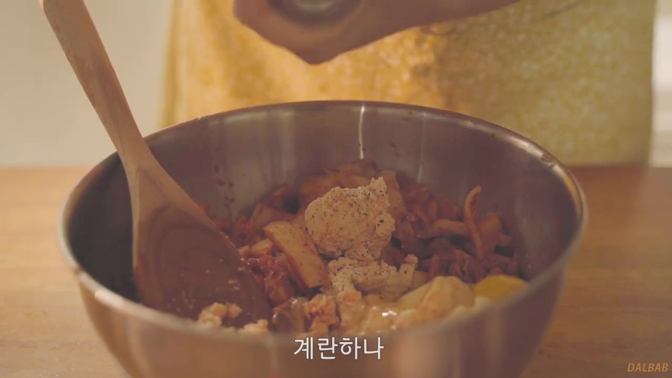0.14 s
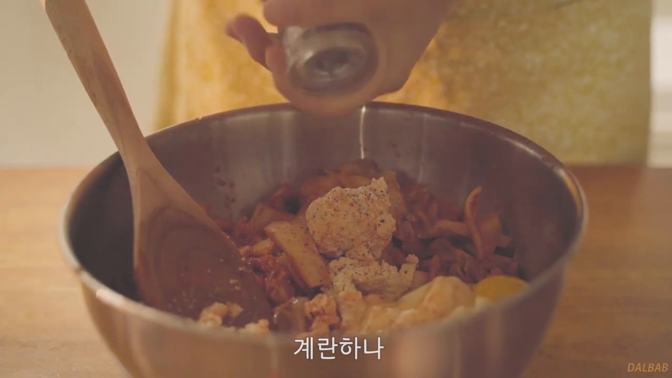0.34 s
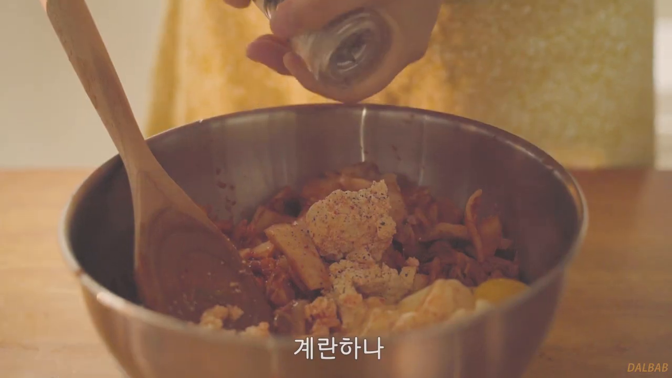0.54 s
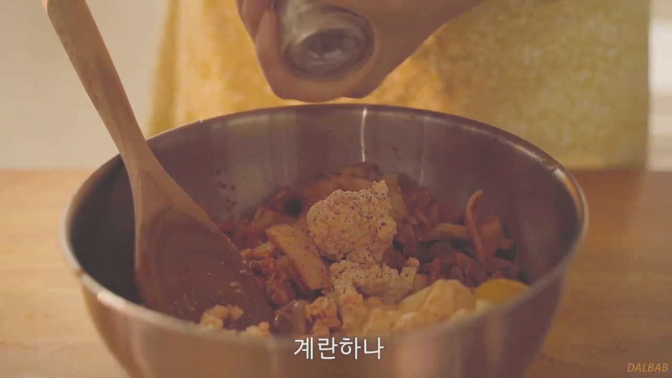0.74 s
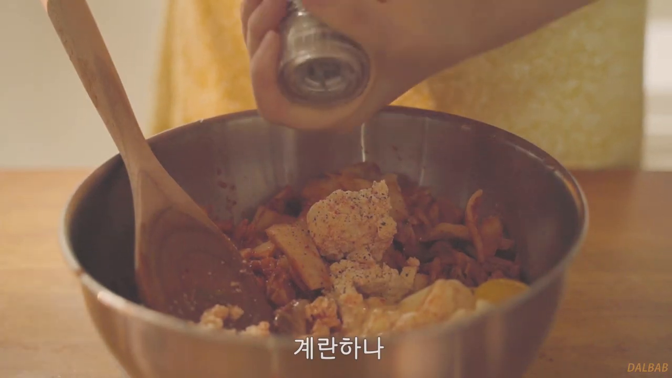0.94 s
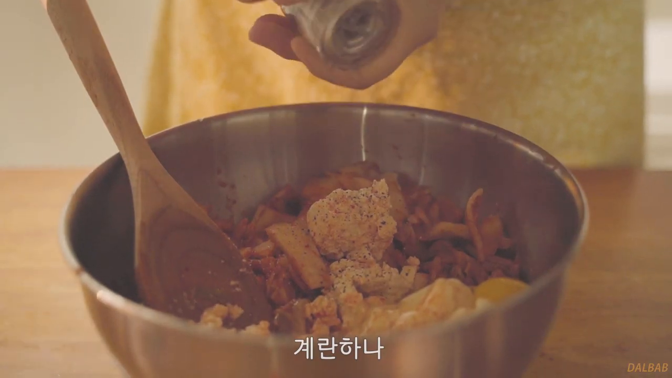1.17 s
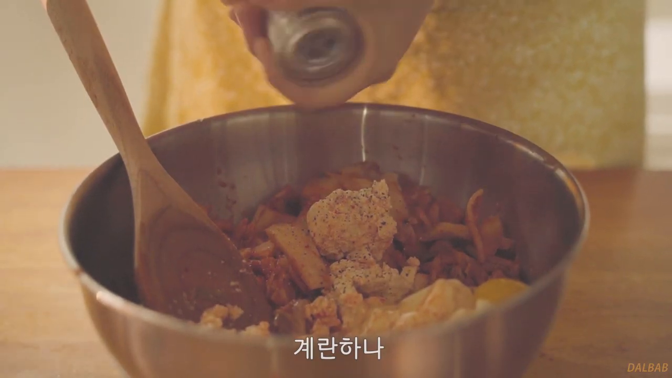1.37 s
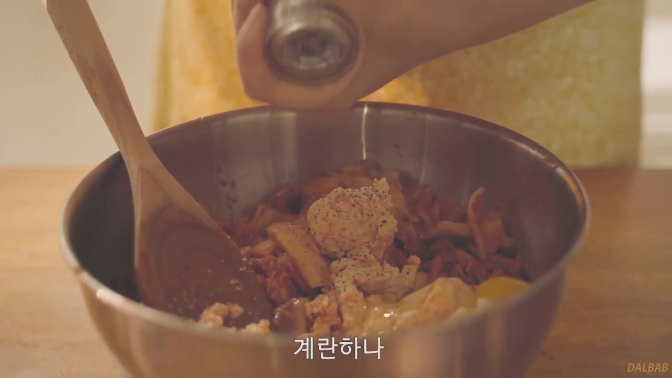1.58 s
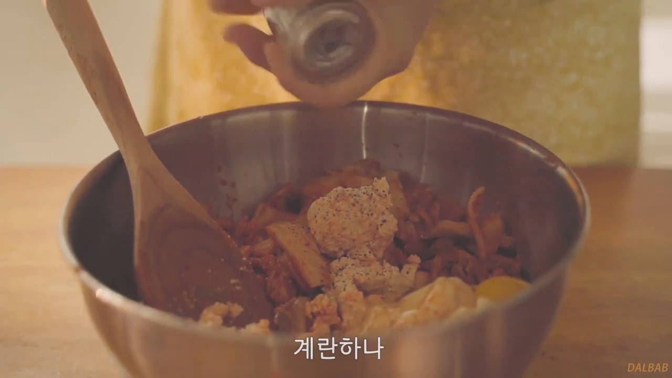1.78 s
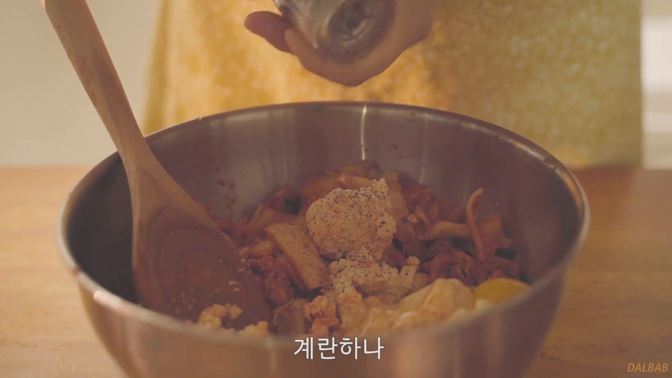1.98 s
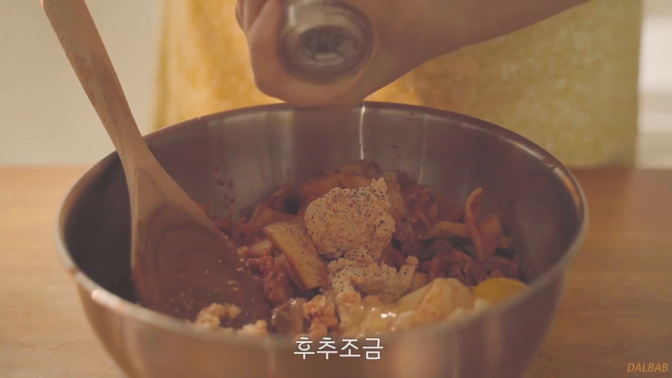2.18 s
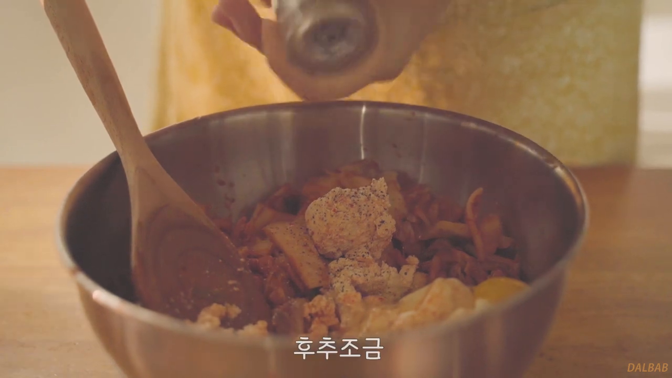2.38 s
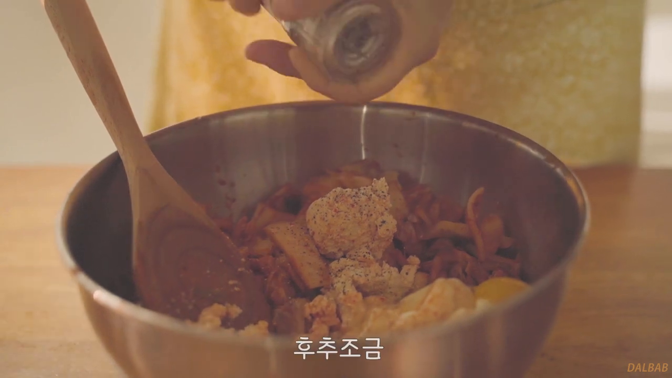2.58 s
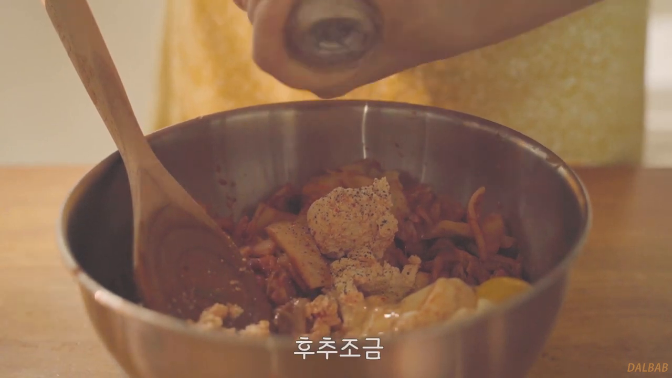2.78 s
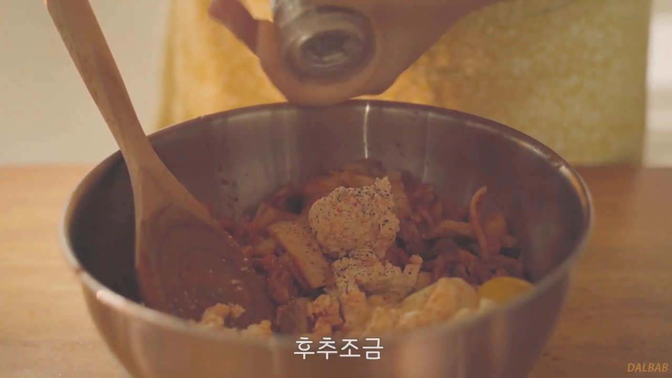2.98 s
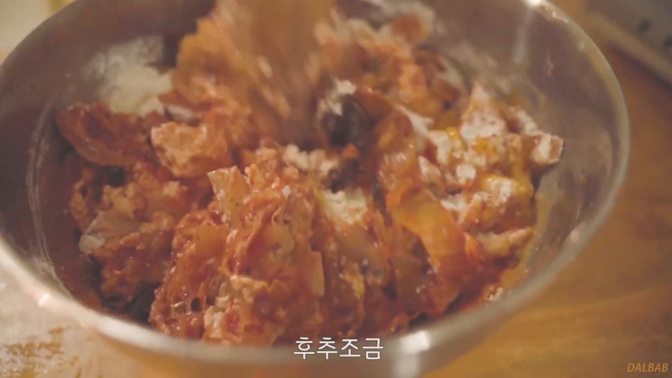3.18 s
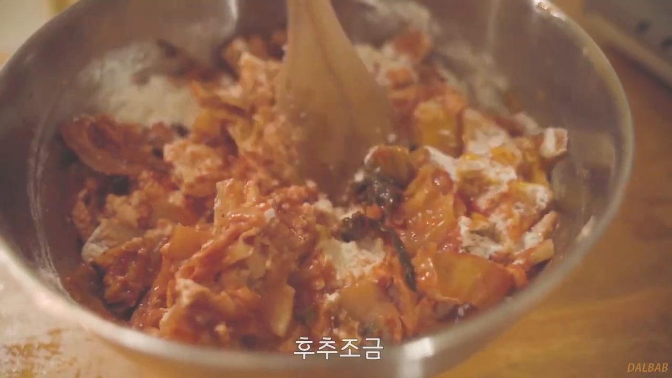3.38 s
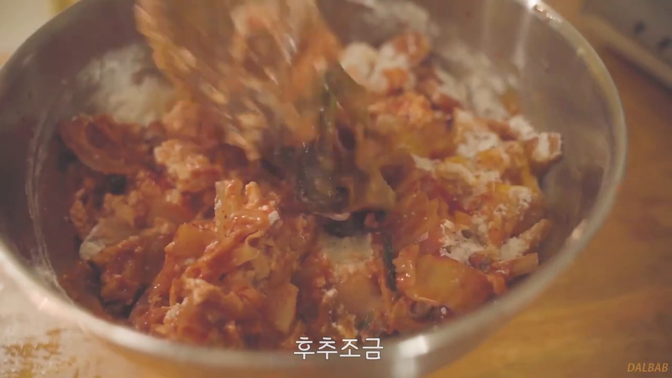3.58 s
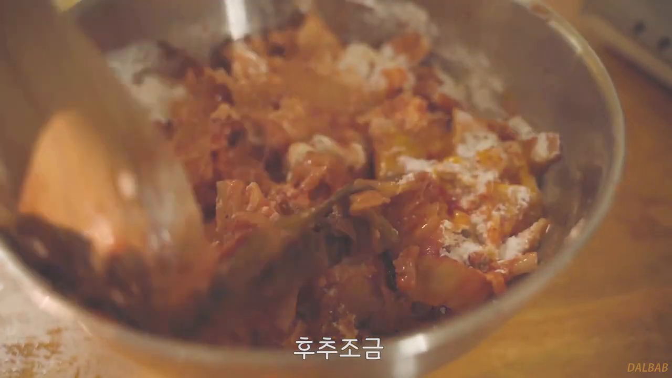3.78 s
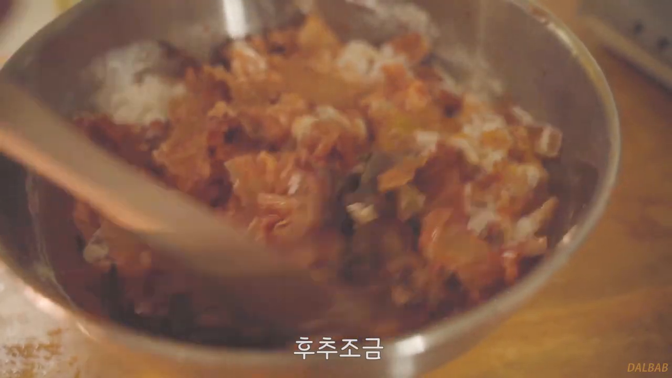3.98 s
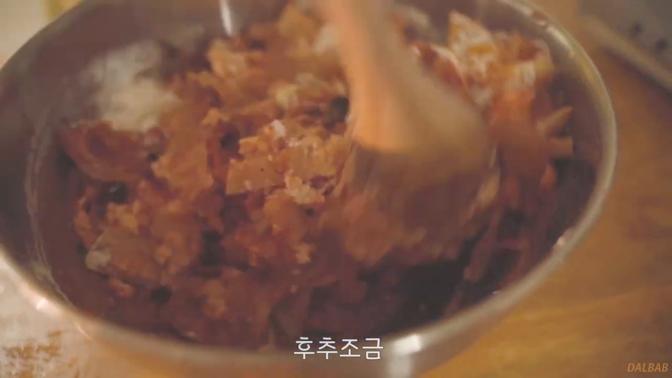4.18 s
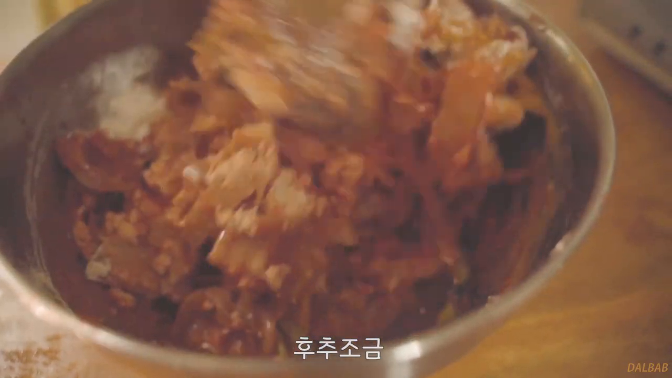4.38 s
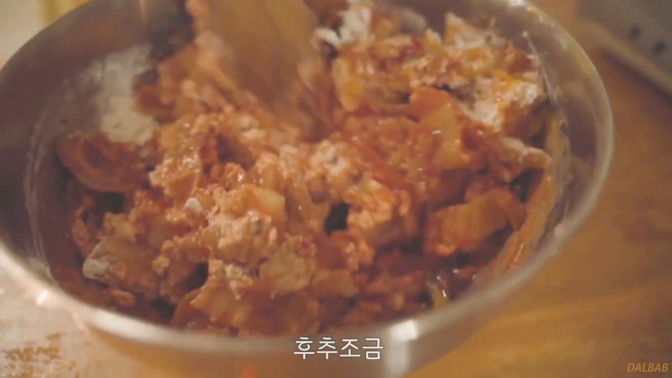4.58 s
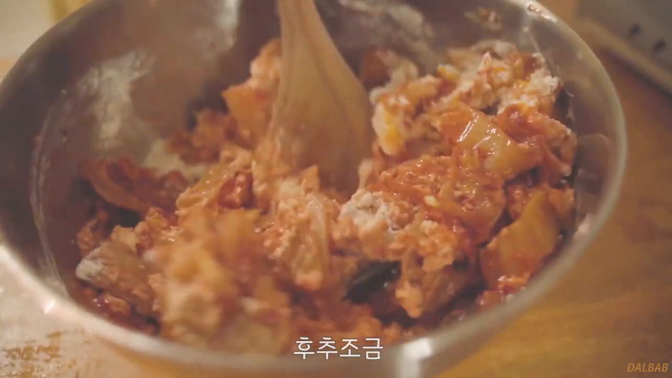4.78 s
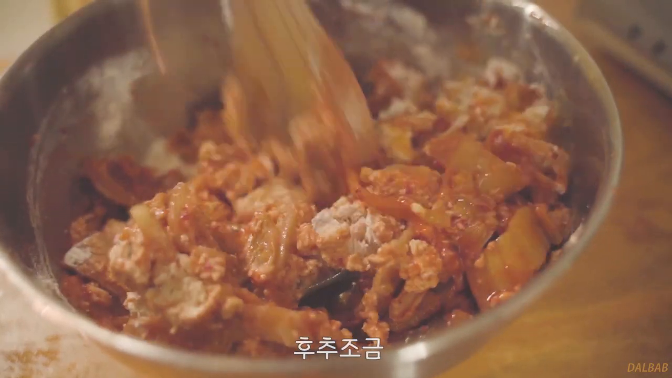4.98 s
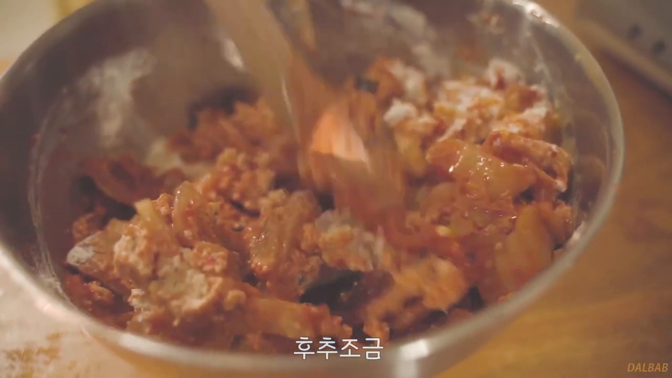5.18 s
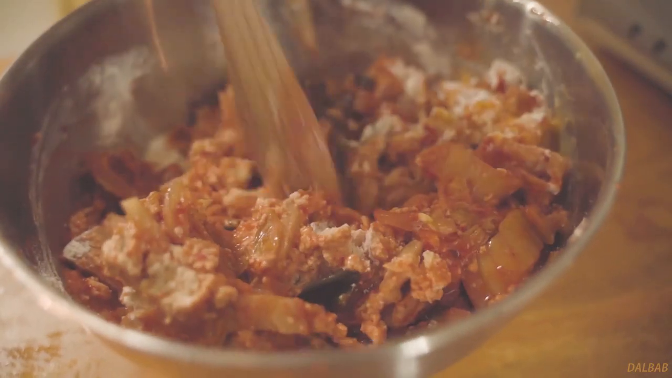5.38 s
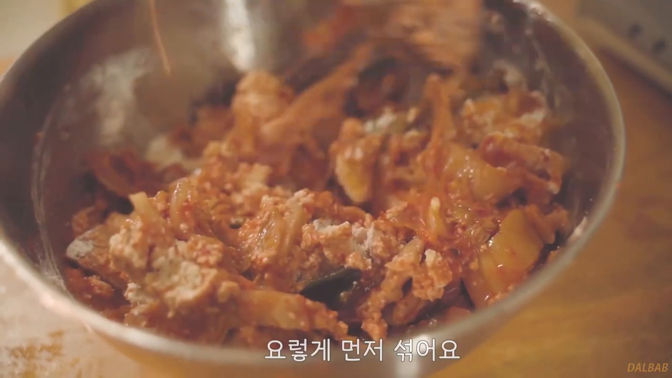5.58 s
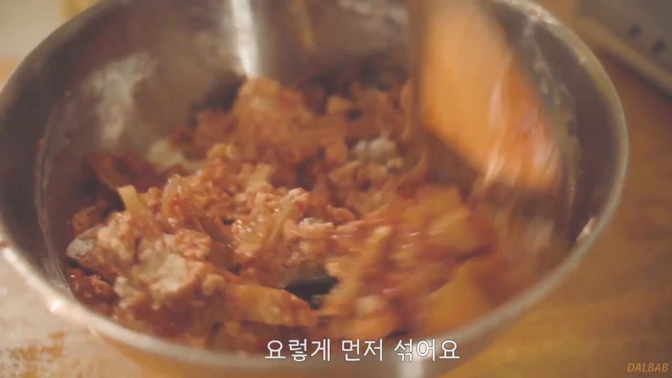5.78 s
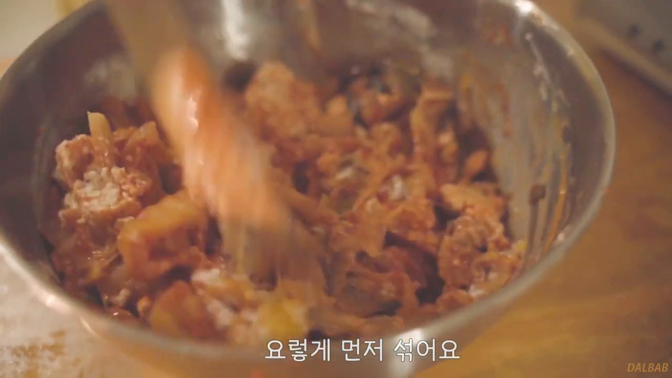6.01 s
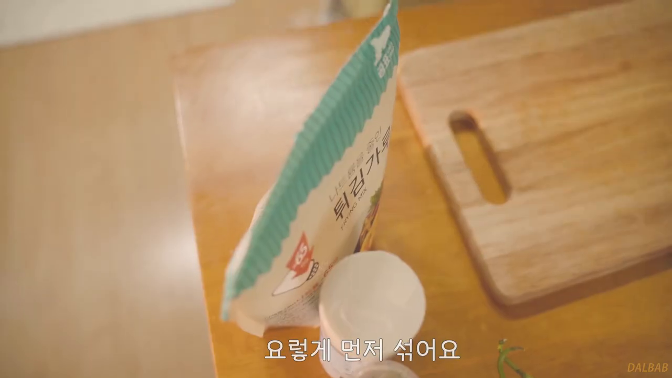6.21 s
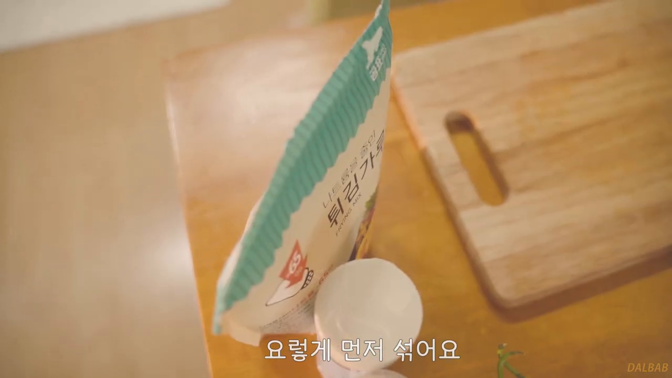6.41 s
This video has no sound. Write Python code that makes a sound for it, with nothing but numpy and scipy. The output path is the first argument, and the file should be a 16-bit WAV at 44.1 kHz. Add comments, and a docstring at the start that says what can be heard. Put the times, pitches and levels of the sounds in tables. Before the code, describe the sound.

Crisp dry peppercorn crunches in rhythmic bursts give way to moist mashing, scrapes and dull bowl knocks, ending with a soft packet slide.

```python
"""Dry cracks and fine grinding in short twists, then wet squelches, scrapes and knocks, and a soft slide at the end.
A hand pepper mill breaks peppercorns over a steel bowl: snapped noise bursts over gated grit. A wooden spoon
mashes wet food in the bowl: bursts for pops, coloured crackle for squelch and drag, ringing blows for knocks.
A packet slides on the wooden table: coloured grains. A quiet kitchen adds hush and reverberation; one microphone.
"""
import sys
import numpy as np
from scipy import signal
from scipy.fft import rfft, irfft, next_fast_len
from scipy.io import wavfile
from scipy.ndimage import uniform_filter1d, minimum_filter1d

SR = 44100
rng = np.random.default_rng(int(sys.argv[2]) if len(sys.argv) > 2 else 0)


def output_pcm(signal):
    """Save a mono or channel-first signal as 16-bit PCM at the path in sys.argv[1].

    Samples are clipped to [-1, 1] before scaling.
    """
    pcm = np.clip(np.atleast_2d(signal).T, -1, 1) * 32767
    wavfile.write(sys.argv[1], SR, np.round(pcm).astype(np.int16))


def volts_from_decibels(level):
    """Turn decibel levels (scalar or array-like) into linear amplitude factors."""
    exponent = np.asarray(level, float) / 20
    return 10 ** exponent


N = 284445

# Kitchen hush. Each row: frequency in Hz, relative density in dB per Hz.
HUSH_SPECTRUM = [(18, -29.5), (30, -18.5), (86, -0.5), (134, -11), (221, -7), (554, -13.5), (5310, -32.5),
                 (10200, -26.5), (16000, -40.5)]
HUSH_RMS_DB = -62.5
# Kitchen reverberation. Each row: frequency in Hz, t60 in seconds.
KITCHEN_T60 = [(200, 0.43), (2000, 0.24), (4500, 0.25), (12000, 0.26)]
# Packet sliding to rest on the table. Each row: time in seconds, gain in dB.
SLIDE_GAIN = [(6.3, -82.5), (6.317, -46.5), (6.36, -48), (6.4, -58), (6.449, -65)]
# Colour of the packet. Each row: frequency in Hz, relative density in dB per Hz.
PACKET_SPECTRUM = [(240, -30), (400, -13.5), (570, -4), (1440, -4), (2250, -21.5), (4240, -8.5),
                   (9320, -16.5), (13700, -13), (16000, -25.5)]
# Faint rubs in one resonance. Each row: start in seconds, end in seconds, centre in Hz, width in Hz, top level in dB.
RUB_BANDS = [(0.156, 0.655, 2150, 800, -50.5), (2.82, 3.124, 1490, 90, -59),
             (3.598, 3.917, 1350, 702, -64.5), (3.92, 4.196, 7500, 1300, -49.5)]

# Spoon striking the bowl. Each row: peak time in seconds, push peak in dB, pitch in Hz, t60 of the push in seconds.
SPOON_KNOCKS = [(3.3567, -27, 320, 0.086), (3.3839, -20.5, 744, 0.041), (3.4052, -34, 970, 0.029),
                (3.4329, -28, 903, 0.034), (3.578, -35, 710, 0.033), (3.6023, -32.5, 806, 0.056),
                (4.0638, -36, 850, 0.016), (4.1403, -30, 270, 0.017), (4.4603, -16, 344, 0.019),
                (4.4705, -12.5, 312, 0.019), (4.6363, -39.5, 1020, 0.02), (4.7472, -7, 420, 0.012),
                (4.7947, -26.5, 910, 0.022), (4.8016, -32, 805, 0.019), (4.831, -22, 352, 0.0073),
                (4.8421, -4, 302, 0.017), (4.9383, -29.5, 920, 0.019), (5.0071, -38, 740, 0.029),
                (5.3126, -32.5, 930, 0.035), (5.3619, -32.5, 920, 0.018), (5.3709, -28.5, 884, 0.018),
                (5.379, -28.5, 169, 0.02), (5.7297, -9.5, 307.5, 0.064)]
# Modes of the loaded bowl. Each row: frequency in Hz, dB over the push for a blow at that pitch, t60 in seconds.
BOWL_MODES = [(253, -22.5, 0.13), (314.7, -28.5, 0.19), (460, -24, 0.089), (592, -19.5, 0.11),
              (709, -13, 0.1), (847, -2.5, 0.049), (1148, 2, 0.025)]
# Jolts of the table top. Each row: peak time in seconds, push peak in dB.
TABLE_JOLTS = [(0.8934, -45), (3.3896, -39.5), (3.937, -52), (4.139, -51), (4.464, -51), (4.75, -39),
               (4.8416, -32), (5.374, -38), (5.7295, -42.5), (6.255, -50.5), (6.3236, -43)]
# Overtone of the table top. Each row: frequency in Hz, dB over the push, t60 in seconds.
TABLE_MODES = [(121, 5, 0.1)]

# Air pockets bursting in the mash. Each row: time in seconds, peak in dB, pitch in Hz, spread in octaves.
MASH_POPS = [(3.1815, -23, 8630, 0.25), (3.2194, -27, 1620, 0.12), (3.269, -27, 9240, 0.26),
             (3.3834, -16, 2600, 0.27), (3.5802, -17.5, 4180, 0.77), (3.659, -22.5, 12300, 0.38),
             (4.015, -23, 7770, 0.21), (4.053, -19.5, 6500, 0.91), (4.065, -24, 4800, 0.8),
             (4.1321, -19, 11000, 0.68), (4.277, -29.5, 3570, 0.24), (4.3285, -19.5, 2570, 0.36),
             (4.371, -26.5, 3030, 0.42), (4.5085, -17.5, 2310, 0.49), (4.5343, -14, 2120, 0.55),
             (4.6258, -18.5, 2330, 0.32), (4.747, -7.5, 2060, 0.91), (4.841, -13.5, 1480, 0.18),
             (5.0686, -18, 12000, 0.61), (5.0786, -21.5, 8770, 0.78), (5.118, -20.5, 9200, 0.39),
             (5.2494, -23, 6750, 1.1), (5.3102, -21.5, 3020, 0.58), (5.364, -22.5, 4300, 0.19),
             (5.4319, -16.5, 4360, 0.27), (5.4571, -18, 10100, 0.28), (5.464, -14.5, 11100, 0.82),
             (5.4793, -18.5, 13700, 0.17), (5.5035, -20, 8800, 0.46), (5.566, -42, 1090, 0.17),
             (5.7239, -8, 4900, 0.55), (5.8935, -23, 3660, 0.57), (5.9477, -23, 4800, 0.5),
             (5.986, -27, 2980, 0.21), (6.0266, -23.5, 4250, 0.26), (6.066, -20.5, 4100, 0.46),
             (6.0953, -21, 5100, 0.7), (6.1066, -16.5, 4460, 0.4), (6.1487, -18.5, 12000, 0.43),
             (6.192, -28.5, 6220, 0.55)]
# Strokes of the spoon. Each row: start in seconds, end in seconds, wet crackle gain in dB, bowl drag gain in dB.
SPOON_STROKES = [(3.184, 3.322, -53.5, -59), (3.357, 3.409, -39, -40.5), (3.576, 3.603, -41.5, -48),
                 (3.91, 3.921, -42, -49), (3.991, 4.04, -46.5, -62), (4.058, 4.153, -46.5, -47),
                 (4.183, 4.415, -48, -62.5), (4.449, 4.556, -40, -48), (4.6, 4.71, -53.5, -57.5),
                 (4.72, 4.95, -47, -44.5), (5.029, 5.127, -50.5, -61), (5.213, 5.244, -58, -58.5),
                 (5.305, 5.32, -43.5, -60), (5.359, 5.36, -46.5, -43), (5.414, 5.493, -51.5, -50.5),
                 (5.751, 5.925, -46.5, -51.5), (5.94, 6.144, -52, -61)]
# Colour of the wet crackle. Each row: frequency in Hz, relative density in dB per Hz.
WET_SPECTRUM = [(590, -41), (1000, -3.5), (2180, -2), (2810, 0), (5310, -5.5), (7620, -2.5), (9490, -7),
                (16000, -7.5)]
# Colour of the drag. Each row: frequency in Hz, relative density in dB per Hz.
DRAG_SPECTRUM = [(88, -17), (150, -7.5), (319, -3.5), (449, -14), (864, -6), (1400, -13), (2730, -25),
                 (4500, -31), (5850, -44.5), (9900, -120)]
# A stroke leads in, drops quickly, then the food settles from a level under the stroke.
LEAD_IN_S, LIFT_DB_PER_S, SETTLE_DB, SETTLE_DB_PER_S = 0.066, 502, -12, 84
# A knock shakes the food: drag gain under the knock, and its fade.
SKID_DB, SKID_DB_PER_S = -25, 366

# Peppercorns breaking between the burrs. Each row: time in seconds, peak in dB before the bass cut, band centre in Hz.
PEPPER_CRACKS = [(0.1607, -5, 7150), (0.169, -14, 7960), (0.1795, 4.5, 4140), (0.391, -15, 2400),
                 (0.4142, -3, 7400), (0.4394, -5.5, 5960), (0.4785, -14.5, 7200), (0.489, -3, 7600),
                 (0.5226, -7, 9300), (0.536, -8.5, 6500), (0.7302, -8.5, 8800), (0.821, -1.5, 6700),
                 (0.8471, -22.5, 4070), (0.8539, -6, 4400), (0.9237, -5, 7560), (0.9508, 5, 2280),
                 (1.127, -4, 7000), (1.1349, -5, 7200), (1.1427, -7, 4300), (1.1644, -7.5, 5400),
                 (1.175, -13.5, 8750), (1.197, -3.5, 8830), (1.228, -4.5, 9450), (1.2352, -16.5, 7000),
                 (1.267, -1.5, 8200), (1.4773, -3, 6300), (1.5019, -6, 5500), (1.5214, -10, 9100),
                 (1.5346, -5.5, 9660), (1.5411, -13.5, 6330), (1.5929, -4.5, 7750), (1.801, -4, 9120),
                 (1.8074, 4.5, 7160), (1.8615, -3, 8300), (1.964, -17, 5000), (2.1117, -6.5, 6360),
                 (2.1261, 1, 3760), (2.1436, -8, 9630), (2.1666, 10.5, 3840), (2.1834, -1.5, 7930),
                 (2.2271, -2, 5400), (2.4225, -14, 8700), (2.4429, -5, 5640), (2.4896, -7.5, 11000),
                 (2.534, -6.5, 9300), (2.5411, -5, 11030), (2.5883, -11, 9450), (2.7982, -2.5, 7200),
                 (2.8163, -12, 7100), (2.8412, -19, 5240), (2.8466, -9, 8530), (2.8553, -2, 6930),
                 (3.0596, -15, 6500), (3.0614, 4.5, 7060), (3.0718, -5, 10000), (3.082, -5, 9200),
                 (3.096, -6, 7700), (3.12, -10, 6160)]
# Colour of the grinding. Each row: frequency in Hz, relative density in dB per Hz.
GRIND_SPECTRUM = [(180, -55), (300, -15), (870, -18), (2360, 0), (3030, -9), (3460, -2), (6520, 0),
                  (12300, -6), (16000, -6.5)]
# Upper bowl modes that answer the mill. Each row: centre in Hz, width in Hz, added response in dB.
BOWL_SHEEN = [(1940, 1800, 0.5), (4040, 720, 5.5), (6500, 190, -2.5)]
# Twists of the wrist, faint ones as the hand regrips. Each row: full speed from and to in seconds,
# grinding gain at the start and at the end in dB, run-up in seconds.
WRIST_TWISTS = [(0.157, 0.186, -15.5, -34.5, 0.002), (0.398, 0.534, -31.5, -36.5, 0.11),
                (0.585, 0.626, -50, -57.5, 0.011), (0.717, 0.85, -41.5, -23.5, 0.055),
                (1.127, 1.241, -36, -28.5, 0.029), (1.445, 1.539, -38, -23, 0.019),
                (1.791, 1.918, -40, -34.5, 0.043), (1.994, 2.057, -55, -64, .02),
                (2.126, 2.197, -26, -25, 0.055), (2.433, 2.537, -32.5, -42.5, 0.056),
                (2.613, 2.697, -55.5, -59.5, .02), (2.763, 2.844, -28, -21.5, 0.073),
                (2.999, 3.112, -36.5, -38, 0.032)]
# Climb of any run-up, twist or stroke.
RUN_UP_DB = 35
# The hand stops: a quick drop, then crumbs trickle from a level under the twist.
STOP_DB_PER_S, TRICKLE_DB, TRICKLE_DB_PER_S = 901.5, -12, 158.5
# Each crack sheds crumbs into the grinding: gain under the crack, and its fade.
CRUMBS_DB, CRUMBS_DB_PER_S = -39, 408


def unit(x):
    """Scaled to rms 1."""
    return x / np.sqrt(np.mean(x ** 2) + 1e-20)


def along(points, hz):
    """(Hz, value) points read on a log frequency axis."""
    point_hz, value = np.transpose(points)
    return np.interp(np.log(hz + 1), np.log(point_hz + 1), value)


def gain_curve(rows):
    """Gain per sample from (s, dB) rows, -120 dB outside them."""
    s, db = np.transpose(rows)
    return volts_from_decibels(np.interp(np.arange(N) / SR, s, db, -120, -120))


def filtered(x, response):
    """x times a response of frequency."""
    size = next_fast_len(N + SR // 2)
    return irfft(rfft(x, size) * response(np.fft.rfftfreq(size, 1 / SR)), size)[:N]


def coloured(x, spectrum, flat_hz):
    """x whitened over flat_hz, shaped by a spectrum and scaled to rms 1."""
    z = rfft(x)
    own = np.sqrt(uniform_filter1d(np.abs(z) ** 2, int(flat_hz * N / SR) + 1))
    colour = volts_from_decibels(along(spectrum, np.fft.rfftfreq(N, 1 / SR)))
    return unit(irfft(z / own * colour, N))


def bursts(s, db, hz, spread_oct, decay_s, skirt_db, snap, size=512):
    """Short decaying noise bursts, each centred on its own band and led by a sharp snap."""
    t = (np.arange(size) - size // 4) / SR
    body = np.exp(-np.abs(t) / np.where(t < 0, decay_s / 16, decay_s))
    shape = body + snap * np.exp(-np.abs(t) * 8 / decay_s)
    octaves = np.log2((np.fft.rfftfreq(size, 1 / SR) + 1) / np.c_[hz]) / np.c_[spread_oct]
    # no two fragments share a colour
    lumps = unit(uniform_filter1d(rng.standard_normal(octaves.shape), size // 32))
    colour = (np.exp(-octaves ** 2 / 4) + volts_from_decibels(skirt_db)) * volts_from_decibels(3 * lumps)
    noise = rng.standard_normal((len(s), size))
    rows = irfft(rfft(shape * noise) * colour, size)
    rows *= volts_from_decibels(np.c_[db]) / np.abs(rows).max(1, keepdims=True)
    at = np.round(np.c_[s] * SR).astype(int) + np.arange(size)
    return np.bincount(at.ravel(), rows.ravel(), N + size * 2)[size // 4:][:N]


def crackle(start_s, end_s, count, hz, scatter_oct, spread_oct, decay_s, size_db, hiss):
    """Random grains of uneven size, rms 1 over their span, on a steady hiss."""
    when, pitch, big = rng.random((count, 3)).T
    s = start_s + when * (end_s - start_s)
    db = -size_db * np.log(big + 1 / 20)
    centre_hz = np.minimum(hz * 2 ** (scatter_oct * (2 * pitch - 1)), SR / 2.5)
    grains = bursts(s, db, centre_hz, np.full(count, spread_oct), decay_s, -21.5, snap=0.27, size=256)
    grains = grains / np.sqrt(np.sum(grains ** 2) / ((end_s - start_s) * SR))
    return grains + hiss * rng.standard_normal(N)


def blows(events, modes, reach_db, rise_cycles):
    """Soft blows swell over a cycle or so at their own pitch and set modes ringing, less by reach_db per octave squared."""
    out, t = np.zeros(N + SR), np.arange(SR // 3) / SR
    mode_hz, level_db, mode_t60 = np.transpose(modes)[:, :, None]
    for s, db, hz, push_t60 in events:
        share_db = level_db - reach_db * np.log2(mode_hz / hz) ** 2 + rng.normal(0, 1.5, mode_hz.shape)
        rise_s = rise_cycles / hz
        swell = 1 - np.exp(-(1.09 * t / rise_s) ** 2)
        push = swell * volts_from_decibels(-60 * t / push_t60) * np.cos(2 * np.pi * hz * (t - rise_s))
        partials = volts_from_decibels(share_db - 60 * t / mode_t60) * np.cos(2 * np.pi * mode_hz * (t - rise_s))
        ring = swell * partials.sum(0)
        out[round((s - rise_s) * SR):][:len(t)] += volts_from_decibels(db) * (push / np.abs(push).max() + ring)
    return out[:N]


def gesture(start_s, end_s, first_db, last_db, lead_s, drop_db_per_s, linger_db, fade_db_per_s):
    """Gain of one movement: a run-up, a hold between two levels, a quick drop and a slower remainder."""
    t = np.arange(N) / SR
    after = np.maximum(t - end_s, 0)
    run_up_db = RUN_UP_DB * np.maximum(start_s - t, 0) / max(lead_s, 1e-3)
    held_db = np.interp(t, [start_s, end_s], [first_db, last_db]) - run_up_db
    return volts_from_decibels(held_db) * np.maximum(volts_from_decibels(-drop_db_per_s * after), volts_from_decibels(linger_db - fade_db_per_s * after))


def wake(events, under_db, fade_db_per_s):
    """Gain that jumps at each event and fades."""
    s, db = np.transpose(events)[:2]
    kicks = np.bincount(np.round(s * SR).astype(int), volts_from_decibels(db + under_db), N)
    return signal.lfilter([1], [1, -volts_from_decibels(-fade_db_per_s / SR)], kicks)


def hush():
    """Steady coloured noise of the quiet kitchen."""
    return volts_from_decibels(HUSH_RMS_DB) * coloured(rng.standard_normal(N), HUSH_SPECTRUM, flat_hz=500)


def kitchen(x):
    """Reverberation: decaying noise with t60 set by frequency, a new tail for each quarter second."""
    out, step = np.zeros(N + SR), SR // 4
    for a in range(0, N, step):
        hz, t, z = signal.stft(rng.standard_normal(SR // 2), SR, nperseg=256)
        decay = volts_from_decibels(-60 * t / along(KITCHEN_T60, hz)[:, None])
        tail = signal.istft(z * decay, SR, nperseg=256)[1]
        wet = signal.fftconvolve(x[a:a + step], tail / np.linalg.norm(tail))
        out[a + 130:][:len(wet)] += wet  # 3 ms behind the direct sound
    return out[:N]


def open_bowl(x):
    """Upper modes of the bowl as resonant bands added to x."""
    def response(f):
        return 1 + sum(volts_from_decibels(db) * 1j * f * width / (hz * hz - f * f + 1j * f * width)
                       for hz, width, db in BOWL_SHEEN)
    return filtered(x, response)


def rubs():
    """Hands and spoon sliding lightly: noise in one resonance, swelling and fading."""
    out, t = np.zeros(N), np.arange(N) / SR
    for start_s, end_s, hz, width_hz, db in RUB_BANDS:
        band = filtered(rng.standard_normal(N), lambda f: np.exp(-((f - hz) / width_hz) ** 2 * 2))
        swell = np.sin(np.pi * np.clip((t - start_s) / (end_s - start_s), 0, 1)) ** .5
        out += volts_from_decibels(db) * unit(band) * swell
    return out


def packet():
    """A soft, slightly grainy slide: coloured grains and hiss under a gain curve."""
    grain = crackle(6.29, 6.45, count=120, hz=1200, scatter_oct=1.2, spread_oct=.3, decay_s=.003,
                    size_db=2, hiss=.8)
    return gain_curve(SLIDE_GAIN) * coloured(grain, PACKET_SPECTRUM, flat_hz=302)


def knocks():
    """Spoon blows ring the modes of the loaded bowl; low jolts ring the table top."""
    bowl = blows(SPOON_KNOCKS, BOWL_MODES, reach_db=5.4, rise_cycles=1.04)
    jolts = [(s, db, 70, .2) for s, db in TABLE_JOLTS]  # 70 Hz, t60 0.2 s
    return bowl + blows(jolts, TABLE_MODES, reach_db=0, rise_cycles=0.78)


def stroke(start_s, end_s, db):
    """Gain of one spoon stroke: a lead-in, a steady hold, a quick drop and the food settling."""
    return gesture(start_s, end_s, db, db, LEAD_IN_S, LIFT_DB_PER_S, SETTLE_DB, SETTLE_DB_PER_S)


def mash():
    """Pops and fine crackle of the wet food, and the lower rub of the spoon dragging through it."""
    s, db, hz, spread_oct = np.transpose(MASH_POPS)
    pops = bursts(s, db, hz, np.maximum(spread_oct, .1), decay_s=0.0012, skirt_db=-43.5, snap=0.71)
    wet_gain = sum(stroke(a, b, wet_db) for a, b, wet_db, _ in SPOON_STROKES)
    drag_gain = sum(stroke(a, b, drag_db) for a, b, _, drag_db in SPOON_STROKES)
    drag_gain = drag_gain + wake(SPOON_KNOCKS, SKID_DB, SKID_DB_PER_S)
    fizz = crackle(3.1, 6.45, count=2400, hz=6500, scatter_oct=1.7, spread_oct=0.28, decay_s=0.0018,
                   size_db=5.0, hiss=0.21)
    rub = crackle(3.1, 6.45, count=900, hz=603, scatter_oct=0.92, spread_oct=0.25, decay_s=0.0046,
                  size_db=-3.0, hiss=0.25)
    wet = wet_gain * coloured(fizz, WET_SPECTRUM, flat_hz=300)
    drag = drag_gain * coloured(rub, DRAG_SPECTRUM, flat_hz=60)
    return pops + wet + drag


def mill():
    """Peppercorns crack as snapped bursts over fine grit gated by the twists and shed crumbs."""
    s, db, hz = np.transpose(PEPPER_CRACKS)
    cracks = bursts(s, db, hz, np.full(len(s), .4), decay_s=0.0021, skirt_db=-7.5, snap=1.2)
    cracks = filtered(cracks, lambda f: f ** 2 / (f ** 2 + 1200 ** 2))  # a small mill radiates no bass
    grit = crackle(.1, 3.2, count=1300, hz=5440, scatter_oct=1.43, spread_oct=0.45, decay_s=0.0011,
                   size_db=7.0, hiss=0.44)
    turning = sum(gesture(*row, STOP_DB_PER_S, TRICKLE_DB, TRICKLE_DB_PER_S) for row in WRIST_TWISTS)
    crumbs = wake(PEPPER_CRACKS, CRUMBS_DB, CRUMBS_DB_PER_S)
    return cracks + (turning + crumbs) * coloured(grit, GRIND_SPECTRUM, flat_hz=300)


def scene():
    """Close sources, their reverberation and the steady hush; the bowl colours only the mill's reverberation."""
    grind = mill()
    stir = mash() + knocks() + packet() + rubs()
    room = kitchen(volts_from_decibels(-18.0) * open_bowl(grind) + volts_from_decibels(-14.5) * stir)
    return (grind + stir + room + hush())[None]


def low_pass(x):
    """Removes everything above the highest recorded frequency."""
    return signal.sosfilt(signal.butter(12, 17140, fs=SR, output="sos"), x)


def record(dry):
    """A fast limiter holds the highest peaks near 0.8, then the top of the band rolls off."""
    need = np.minimum(1, .8 / (np.abs(dry[0]) + 1e-9))
    gain = uniform_filter1d(minimum_filter1d(need, size=88), size=88)  # 2 ms windows
    mix = filtered(dry[0] * gain, lambda f: 1 / (1 + (f / 16100) ** 50))
    return low_pass(mix[None])


dry = scene()
out = record(dry)
output_pcm(out)
```